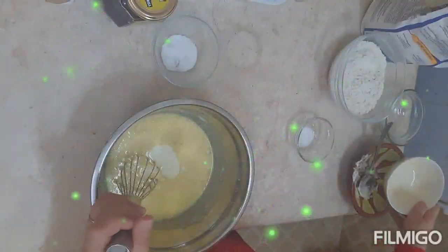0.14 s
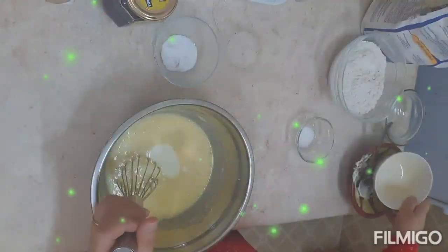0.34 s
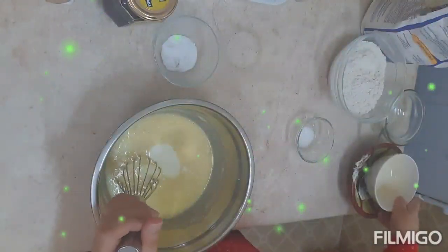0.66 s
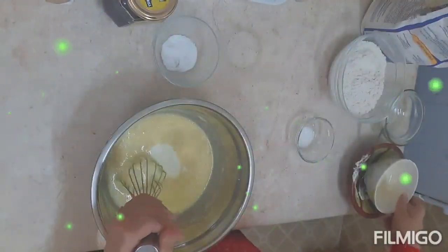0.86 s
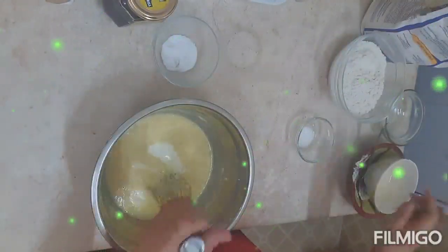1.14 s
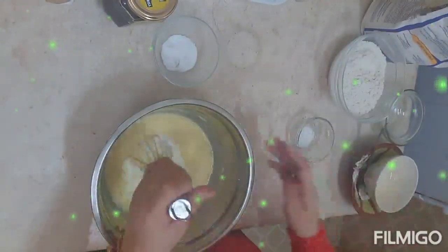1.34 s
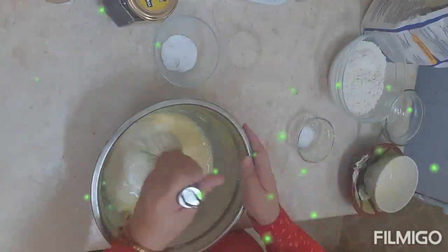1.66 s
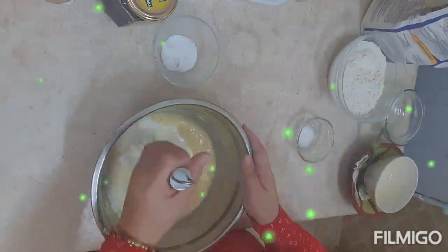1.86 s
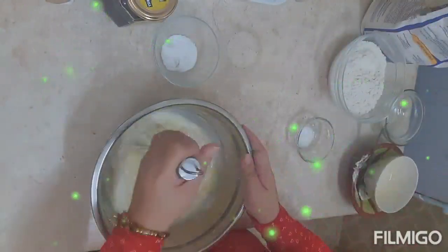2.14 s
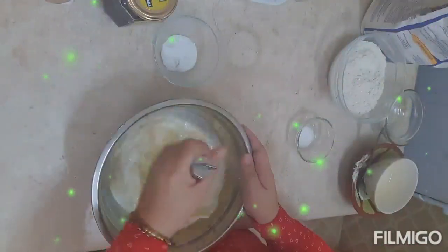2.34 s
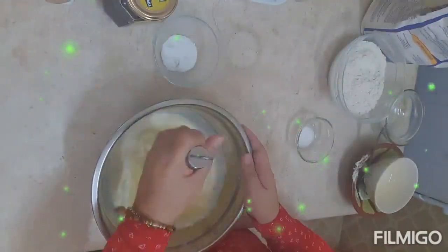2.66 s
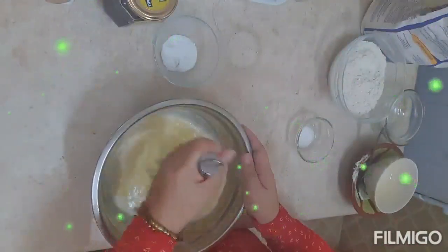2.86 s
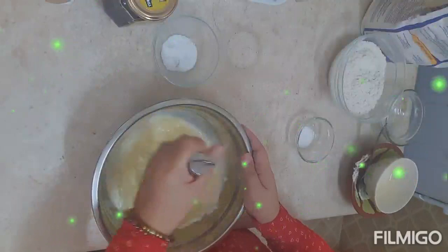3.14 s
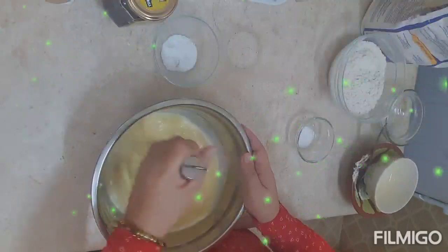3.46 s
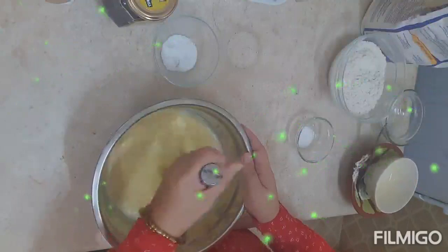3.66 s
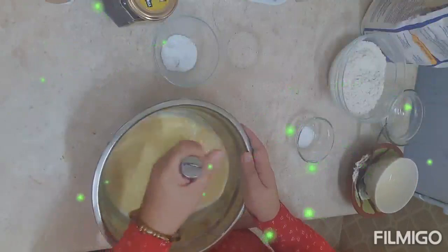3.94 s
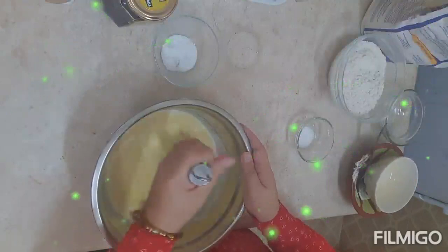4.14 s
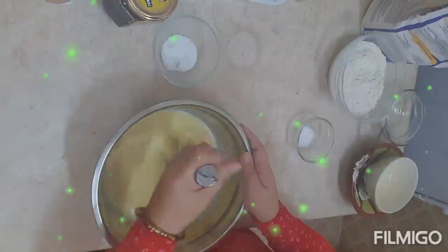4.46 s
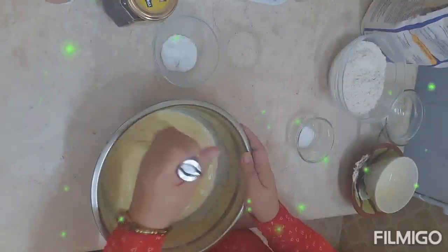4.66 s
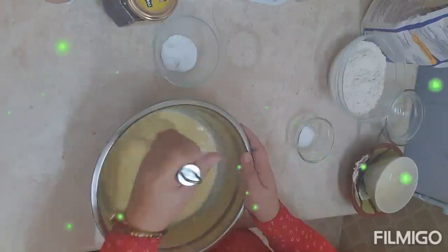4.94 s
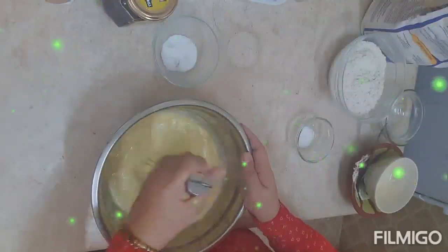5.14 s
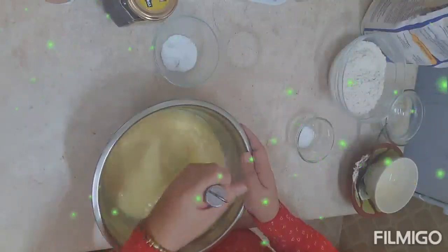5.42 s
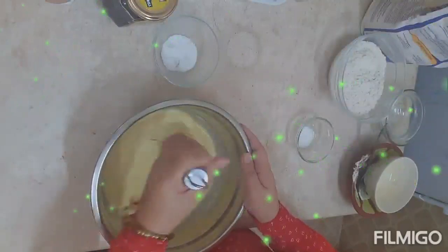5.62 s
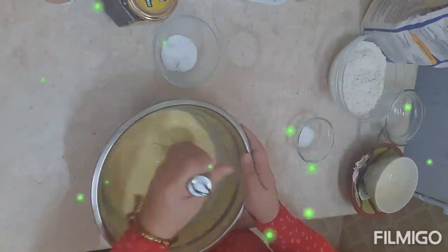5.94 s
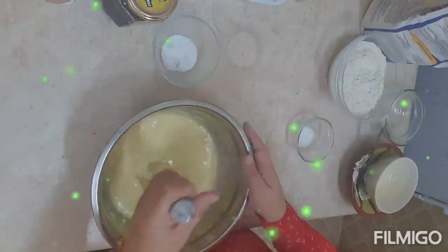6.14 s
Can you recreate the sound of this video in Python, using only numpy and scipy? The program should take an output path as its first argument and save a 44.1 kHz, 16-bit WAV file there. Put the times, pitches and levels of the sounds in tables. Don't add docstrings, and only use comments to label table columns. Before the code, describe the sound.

A refrigerator hums low and whines thinly in a hard-walled kitchen, heard by a small stereo pair just above the work. Whisk wires rustle barely audibly at 0.2-0.3 seconds. At 0.47 a china cup lands on dishes, foot then rim, a dry double clack with a short rattle. Light whisk touches tick the steel bowl at 0.9 and 1.3. Stirring starts with strong, bright clanks at 1.55, 1.68 and 1.95, the first with more low body. From 2 to 3.5 the wires mostly swish and hiss, with wet batter slaps, small pops and thin wire clicks. Knocks return at 3.55 and 3.85; after more swishing and slaps, they come steadily from 4.7, at 4.97, 5.25, 5.58, 5.91 and 6.23. Each cracks sharply, with a short damped metallic ring and room reverberation. Occasional dull counter thuds sit underneath.

```python
import sys
import numpy as np
from scipy import signal
from scipy.fft import rfft, irfft, next_fast_len
from scipy.io import wavfile
from scipy.ndimage import uniform_filter1d

SR = 44100
rng = np.random.default_rng(int(sys.argv[2]) if len(sys.argv) > 2 else 0)


def store_wav(level_fs):
    pcm = np.round(np.clip(np.atleast_2d(level_fs), -1, 1) * 32767)
    wavfile.write(sys.argv[1], SR, pcm.T.astype(np.int16))


def ratio_of_db(decibels):
    return 10 ** (np.asarray(decibels, float) / 20)


N = 277279

# (t/s, peak level/dB, low thud/dB, upper ring/dB, left minus right/dB)
KNOCKS = [(0.9248, -29, -15, -5.5, 1.5), (1.31, -32, -23.5, -12, 4.5), (1.3285, -37, -19, -15, -3),
          (1.548, -16.5, -6.5, -12, -1), (1.6803, -14, -19, -15, -0.5), (1.9456, -13, -15.5, -11, 2),
          (3.5488, -13.5, -19.5, -15, 1), (3.8539, -16, -18, -15.5, 1.5), (4.6836, -14.5, -21.5, -14.5, 0),
          (4.967, -14.5, -19.5, -12, 2.5), (5.253, -14, -17.5, -16.5, 1.5), (5.5797, -13, -19, -17, 3),
          (5.9126, -13.5, -22.5, -17.5, 0), (6.2306, -13.5, -22.5, -13.5, 0.5)]
# (f/Hz, width/Hz, level/dB)
WALL = [(784, 30, -1.5), (1049, 15.6, -2), (1240, 62, -1), (1941, 62, 6), (2530, 55, -4.5), (3330, 71, -2),
        (4074, 19, -0.5), (4210, 21, -5), (4520, 77, -7), (5374, 27, 0), (5600, 54, -13), (5980, 20, 7),
        (6870, 24, 0.5), (6590, 16, 8), (7105, 8.7, 10.5), (7530, 28, 2), (7800, 53, 4), (7430, 39, 2.5),
        (8110, 18, -12), (9180, 15, 0.5), (10500, 220, 18.5), (11300, 380, 24), (11740, 23, 7.5),
        (12800, 170, -20), (13300, 120, 4)]
GRIP_S = 1.45
SWELL_S = 0.012


def knocks():
    # (f/Hz, level/dB)
    crack_colour = [(180, -53), (300, -30), (1450, 5.5), (1900, -28), (2880, -3), (4100, 11), (7010, 5.5),
                    (8570, 7), (9320, -48), (12400, -39), (15200, -30), (16500, -52)]
    lead = 900
    out, rings, shocks = np.zeros((3, 2, N))
    thin_wires = signal.butter(4, [10500, 15500], "band", fs=SR, output="sos")
    for s, db, low_db, upper_db, pan_db in KNOCKS:
        top_db = -24 + 0.3 * upper_db
        force = np.pad(contact(0.011, decay_s=0.0077), ((0, 0), (lead, 4000)))
        skid = rng.standard_normal((2, lead)) * np.exp(np.linspace(-3.5, 0, lead))
        force[:, :lead] = ratio_of_db(-39) * skid
        sharp = np.pad(np.ones((2, 1)), ((0, 0), (lead + 40, force.shape[1] - lead - 41)))
        blow = .8 * sharp + .6 * force
        tilt = [(250, low_db - 14), (700, low_db + 5), (2500, low_db + 12.5), (3100, 0.0039), (5700, 0.0095),
                (6400, upper_db + 6.0), (8550, upper_db + 12.0), (8950, top_db + 14.0),
                (15000, top_db + 4.5), (16500, top_db)]
        crack = coloured(force, crack_colour)
        body = ratio_of_db(-10.5) * wall(blow) + ratio_of_db(-17.5) * belly(blow, lead)
        short = coloured(ratio_of_db(12.5) * crack + body, tilt)
        sizzle = signal.sosfilt(thin_wires, force)
        short = short / np.max(np.abs(short)) + ratio_of_db(top_db + 12.5) * sizzle / np.max(np.abs(sizzle))
        short[1] = np.roll(short[1], 1)
        start_s = s - .001 - lead / SR
        add(out, start_s, db + 5.5, pan_db, short)
        add(shocks, start_s, db, pan_db, coloured(coloured(sharp, crack_colour), tilt))
        rim_db, rim_ring = rim(held=s >= GRIP_S)
        add(rings, s, db + rim_db, pan_db, rim_ring)
    return out, rings, shocks


def wall(blow):
    total = 0
    for hz, width, db in WALL:
        level_db = db + 2.2 * rng.standard_normal((2, 1))
        sign = rng.choice([-1, 1], (2 if hz > 2200 else 1, 1))
        total = total + ratio_of_db(level_db) * sign * ring(blow, hz, min(1.02 / width, .022))
    return total


def belly(blow, lead):
    # (f/Hz, level/dB, time to fall 60 dB/s)
    belly_notes = [(3400, -7, 0.21), (3420, -4, 0.26), (3544, -3, 0.14), (4100, 5, 0.1), (4600, 0, 0.15),
                   (5240, -3.5, 0.12), (5500, -8, 0.088), (6050, 3, 0.11), (6465, 5, 0.09),
                   (7550, -1, 0.059)]
    total = sum(ratio_of_db(db + 0.96 * rng.standard_normal((2, 1))) * ring(blow, hz, t60)
                for hz, db, t60 in belly_notes)
    since_s = np.maximum(np.arange(blow.shape[1]) - lead, 0) / SR
    return total * (1 - np.exp(-since_s / SWELL_S))


def rim(held):
    # (f/Hz, level/dB, time to fall 60 dB/s)
    rim_notes = [(1760, -17, 0.48), (1890, -21.5, 0.81), (3462, -6, 0.84), (3400, -9, 0.7),
                 (3553, -10.5, 0.61), (3996, -5, 0.37), (4070, -2, 0.83), (4610, -5.5, 1),
                 (5140, -10, 0.96), (5500, -12, .6), (6050, -24, .6), (4400, -8, 0.87)]
    # (level/dB, share of ring time, upper notes/dB)
    rim_free = (-9.5, 0.823, -14.5)
    rim_held = (-22.5, 0.746, 0.43)
    rim_db, ring_share, upper_db = rim_held if held else rim_free
    span = round(.6 * SR)
    tap, total = np.pad(np.ones((1, 1)), ((0, 0), (0, span))), 0
    knots = np.arange(0, span, 900)
    for hz, db, t60 in rim_notes:
        waver_db = np.interp(np.arange(span + 1), 1.78 * knots, rng.standard_normal(len(knots)))
        level_db = db + upper_db * (hz > 3700) + 0.96 * rng.standard_normal((2, 1))
        level_db = level_db + (3.2 + 9 * (1 - ring_share)) * waver_db
        shifted_hz = hz + 25 * (1 - ring_share) * rng.standard_normal()
        total = total + ratio_of_db(level_db) * ring(tap, shifted_hz, t60 * ring_share)
    return rim_db, total * (1 - np.exp(-np.arange(span + 1) / SR / SWELL_S))


def knock_notes():
    # (t/s, f/Hz, level/dB)
    knock_leads = [
        (.9251, 4360, -42),
        (.9251, 7900, -42),
        (.9251, 6700, -52),
        (1.3095, 4400, -50),
        (1.3095, 7800, -47.5),
        (1.3289, 7760, -46),
                   (1.546, 1238, -34), (1.547, 4380, -21), (1.549, 5630, -35.5), (1.548, 6780, -30),
                  (1.548, 726, -41), (1.681, 4440, -29), (1.680, 5200, -28), (1.681, 6740, -29),
                  (1.680, 7752, -30), (1.680, 3480, -39), (1.946, 4380, -28), (1.945, 5270, -30),
                  (1.946, 6590, -29), (1.947, 7000, -25.5), (1.946, 7790, -26), (1.945, 4090, -36),
                  (3.5486, 3740, -32), (3.547, 4130, -30.5), (3.549, 5500, -30), (3.549, 6100, -38),
                  (3.548, 7250, -41), (3.5475, 8400, -31.5), (3.854, 3553, -33), (3.854, 4020, -30.5),
                  (3.855, 5580, -32.5), (3.854, 5930, -32), (3.854, 6520, -34), (3.853, 7400, -37),
                  (4.684, 3520, -30), (4.683, 3980, -40), (4.684, 5310, -30.5), (4.686, 6130, -29.5),
                  (4.684, 6770, -31), (4.684, 8430, -28), (4.967, 4050, -29), (4.966, 4650, -30),
                  (4.967, 6130, -30), (4.966, 6880, -27), (4.967, 8600, -39), (5.253, 3563, -32),
                  (5.253, 4026, -26.5), (5.253, 4690, -29), (5.252, 6050, -29.5), (5.253, 1890, -32.5),
                  (5.58, 4010, -26), (5.5785, 4730, -25.5), (5.5796, 6030, -30), (5.5794, 6465, -32),
                  (5.5791, 1920, -37.5), (5.912, 4010, -28), (5.913, 4370, -41), (5.913, 6060, -29),
                  (5.912, 7460, -32), (5.913, 1914, -39), (6.228, 4360, -42), (6.2318, 5240, -38),
                  (6.23, 7170, -31), (6.2304, 7700, -42), (6.2304, 1890, -43), (5.253, 8260, -30)]
    return leading_notes(knock_leads, 7.5, t60=0.038)


def loops():
    # (f/Hz, level/dB, time to fall 60 dB/s)
    loop_notes = [(3490, 4, 0.75), (3900, -16, 0.45), (4660, -1.5, 0.86), (4600, -4, 0.95),
                  (5150, -2, 0.65), (5400, -3, 0.47), (5660, -11, .6), (6200, -5, .5), (6460, -8, 0.4),
                  (7360, -13, .6), (7750, -10, 0.51), (8500, -14, 0.67)]
    out, t = np.zeros((2, N)), np.arange(round(.45 * SR)) / SR
    hz, level_db, t60 = np.transpose(loop_notes)[:, :, None]
    knots = np.linspace(0, .45, num=12)
    for s, db in [row[:2] for row in KNOCKS if row[0] > GRIP_S]:
        chance = rng.standard_normal((len(loop_notes), len(knots)))
        waver = np.array([np.interp(t, knots, row) for row in chance])
        gain = ratio_of_db(level_db + 4.0 * waver - 60 * t / t60) * (1 - np.exp(-t / SWELL_S))
        sides = np.sin(2 * np.pi * (hz * t + rng.random((2, len(loop_notes), 1))) + waver)
        add(out, s, db - 22, 1.0, np.sum(gain * sides, axis=1))
    return out


def drag():
    # (t/s, level/dB)
    effort = [(1.2, -60), (1.4, -59), (1.9, -56), (2.3, -54), (2.5, -51), (2.65, -56), (2.95, -50.5),
              (3.12, -57), (3.35, -52.5), (3.7, -62), (4.03, -53), (4.22, -62), (4.46, -45.5), (4.6, -57),
              (4.8, -56), (5.15, -54.5), (5.6, -57.5), (6.29, -53.5)]
    # (f/Hz, level/dB)
    swish_colour = [(350, -56), (600, -26), (657, -3), (980, -14), (1740, -3), (1930, -2.5), (3470, -5),
                    (5790, 1.5), (7680, -1), (9000, -10.5), (11700, -12), (19800, -120)]
    # (f/Hz, level/dB)
    hiss_colour = [(5000, -34), (8500, -25), (9330, -25.0), (10600, -1.5), (12000, 2.0), (13500, -3.0),
                   (15500, 0.5), (15900, -56)]
    t = np.arange(N) / SR
    effort_db = np.interp(t, *np.transpose(effort))
    stirring = np.clip((t - 1.2) / 0.28, 0, 1)
    stroke_db = 2.6 * drift(9)
    scrape = ratio_of_db(-24) * after_knocks(rise_s=0.013, fall_s=0.072)
    swish = (ratio_of_db(effort_db + stroke_db) + scrape) * patchy(wide_noise(swish_colour, grain=1.8))
    fine = ratio_of_db(-60 + 0.93 * (effort_db + 54.5) + stroke_db + 1.2 * drift(30))
    fine_scrape = ratio_of_db(-48) * after_knocks(rise_s=0.035, fall_s=0.06)
    hiss = (fine + fine_scrape) * wide_noise(hiss_colour, grain=0.38)
    return stirring * (swish + hiss + batter(effort_db - 9.5)) + flecks(effort_db)


def patchy(x):
    edges, total = np.geomspace(400, 17000, num=12), 0
    for band in zip(edges, edges[1:]):
        part = signal.sosfilt(signal.butter(2, band, "band", fs=SR, output="sos"), x)
        total = total + ratio_of_db(1.4 * drift(18.0)) * part
    return rms_one(total)


def flecks(swish_db):
    # (t/s, level/dB, length/s)
    rustles = [
        (0.162, -60, 0.036),
        (0.21, -67, 0.017),
        (.325, -65, 0.033),
    ]
    t, grazes_per_s = np.arange(N) / SR, 260
    pitches = [hz for hz, width, db in WALL if 4000 < hz < 8500][::2] + [5180, 7310, 5900]
    born = (rng.random(N) < grazes_per_s / SR) * ratio_of_db(1.8 * np.minimum(rng.exponential(1, N), 3))
    dealt = rng.integers(0, len(pitches), N)
    rub = rng.standard_normal((2, SR // 2))
    graze = sum(ring(born * (dealt == k), hz, 0.035) * rng.uniform(-1.3, 1, (2, 1))
                for k, hz in enumerate(pitches))
    out = ratio_of_db(swish_db - 9) * rms_one(graze) * (t > 1.3)
    rustle = rms_one(sum(ring(rub, hz, 0.2) for hz in pitches))
    swell = sum(ratio_of_db(db) * np.exp(-((t[:SR // 2] - s) / length_s) ** 2) for s, db, length_s in rustles)
    out[:, :SR // 2] += rustle * swell
    return out


def batter(swish_db):
    sizes = ratio_of_db(0.87 * np.minimum(rng.exponential(1, N), 4)) * rng.choice([-1, 1], N)
    born = rng.random(N) < 60 * ratio_of_db(6 * drift(7)) / SR
    pitches, dealt = np.geomspace(600, 2600, num=9), rng.integers(0, 9, N)
    bubbles = sum(ring(sizes * born * (dealt == k), hz, 38.0 / hz) * ratio_of_db(3.5 * rng.standard_normal((2, 1)))
                  for k, hz in enumerate(pitches))
    return ratio_of_db(.5 * (swish_db + 38.0) - 62) * rms_one(bubbles)


def ticks():
    # (t/s, peak level/dB, f/Hz, brightness/dB)
    slaps = [(1.435, -31, 2130, -15), (1.436, -39, 1410, -22), (1.836, -41.5, 1240, -14),
             (2.174, -38, 1430, 2), (2.366, -38, 2020, -27), (2.408, -32.5, 1450, -21),
             (2.419, -41, 860, -18), (2.719, -31, 2070, -11), (2.726, -35, 717, -6), (2.74, -34, 720, 23),
             (2.885, -35.5, 2500, -1.5), (2.895, -37, 2560, -8), (3.162, -44, 1900, -19),
             (3.234, -41, 1610, -2), (4.051, -41.5, 1590, -19), (4.065, -41.5, 1730, -26),
             (4.089, -44, 1630, -17), (4.15, -39, 1440, -2), (4.344, -42, 2060, -65),
             (4.358, -45, 1360, -29), (4.39, -47.5, 670, -4), (4.434, -43, 1330, -17),
             (4.457, -32, 1480, 11), (4.506, -44, 2520, -3), (4.538, -44.5, 1360, -18),
             (4.59, -48.5, 662, -24), (4.632, -48, 1600, -22), (4.666, -34.5, 1220, -5),
             (4.747, -60, 1970, -23), (4.896, -42, 1740, -15), (4.939, -33.5, 1880, -4),
             (5.022, -39, 582, -15), (5.03, -58, 1210, -20), (5.209, -36, 1690, -11)]
    wire_snaps = [(2.408, -25, 3600, -31), (2.929, -30, 2620, -8), (3.434, -36, 4400, -3),
                  (2.679, -44, 6680, -3), (2.737, -35, 7430, -17), (2.884, -49, 7400, -5),
                  (2.894, -42, 7350, -10), (3.064, -45, 8000, -8), (3.358, -42, 7890, -10),
                  (3.434, -39, 7250, -6), (4.392, -28, 5400, 2), (4.460, -38, 6480, 5),
                  (4.508, -39, 6110, 6)]
    out = np.zeros((2, N))
    smeared = [(*row, 0.0084) for row in slaps] + [(*row, 0.001) for row in wire_snaps]
    for s, db, hz, bright_db, smear_s in smeared:
        force = np.pad(contact(0.086, decay_s=smear_s), ((0, 0), (0, 2500)))
        slap = ring(force, hz, 30.0 / hz) + 2.55 * ring(force, 1.46 * hz, 2.5 / hz)
        slap = slap + .5 * ring(force, 720, 0.025)
        click = sum(ring(force, wall_hz, min(0.25 / width, .008)) * ratio_of_db(wall_db)
                    for wall_hz, width, wall_db in WALL if 3000 < wall_hz < 9000)
        add(out, s - .001, db, 0, rms_one(slap) + ratio_of_db(bright_db + 0.5) * rms_one(click))
    return signal.sosfilt(signal.butter(3, 470, "high", fs=SR, output="sos"), out)


def pops():
    # (t/s, f/Hz, level/dB)
    blobs = [(2.408, 1165, -46), (2.725, 1170, -44.5), (2.728, 1700, -49), (2.93, 1370, -52),
             (3.552, 1040, -37), (3.56, 716, -44.5), (4.342, 2040, -45), (4.358, 1300, -53),
             (4.395, 646, -46.5), (4.435, 1330, -43), (4.454, 1440, -40), (4.454, 734, -56),
             (4.538, 1330, -53), (4.63, 1610, -49), (4.705, 754, -49), (4.70, 1950, -47), (4.94, 2020, -41),
             (4.94, 710, -53), (5.025, 538, -48), (5.022, 1260, -46)]
    return leading_notes(blobs, 0.5, t60=0.031)


def cup():
    # (t/s, peak level/dB, brightness/dB)
    cup_hits = [
        (0.47, -23.5, -5),
        (0.494, -23.5, -2.5),
    ]
    # (f/Hz, level/dB, time to fall 60 dB/s)
    china_notes = [(1070, -28, 0.045), (1360, -0.5, 0.036), (1330, -23, 0.069), (1570, -0.5, 0.022),
                   (1895, 1.5, 0.026), (2134, -3.5, 0.033), (2560, 4.5, 0.0094), (3060, -7, 0.016),
                   (3740, 10, 0.0033), (3685, -7.5, 0.21), (4600, -3, 0.013), (5240, 6, 0.0073),
                   (5530, -7, 0.022), (5730, -15, 0.18), (7000, -1, 0.013), (7480, 3, 0.0092),
                   (10790, 2, 0.0072), (11500, -12, 0.006)]
    out = np.zeros((2, N))
    rattle_band = signal.butter(4, [800, 7800], "band", fs=SR, output="sos")
    for s, db, bright_db in cup_hits:
        force = np.pad(contact(0.055, decay_s=0.0089), ((0, 0), (0, SR // 3)))
        body = 0
        for hz, note_db, t60 in china_notes:
            level_db = note_db + 2.0 * rng.standard_normal((2, 1)) + bright_db * (hz > 3000)
            body = body + ratio_of_db(level_db) * ring(force, hz, t60)
        rattle = signal.sosfilt(rattle_band, force)
        add(out, s - .001, db + 0.5, 1.5, body + ratio_of_db(21.5) * rattle)
    return signal.sosfilt(signal.butter(2, 12000, fs=SR, output="sos"), out)


def cup_notes():
    # (t/s, f/Hz, level/dB)
    cup_leads = [
        (.47, 1277, -36.5),
        (.47, 1377, -37),
        (.474, 4940, -37),
        (.47, 5750, -36.5),
        (.494, 1855, -44),
        (.494, 2530, -38),
        (.494, 5100, -35),
        (.494, 6920, -37),
        (.494, 1435, -43),
    ]
    return leading_notes(cup_leads, 7, t60=0.046)


def thuds():
    # (t/s, peak level/dB)
    foot_thuds = [
        (1.682, -40),
        (3.547, -32),
        (4.686, -30.5),
        (4.969, -38),
    ]
    hz, t60 = 298, 0.0073
    out = np.zeros((2, N))
    push = np.pad(np.hanning(40)[None].repeat(2, axis=0), ((0, 0), (0, 3000)))
    body = ring(push, hz, t60) + 1.6 * ring(push, 1.86 * hz, t60)
    for s, db in foot_thuds:
        add(out, s, db, 0, body)
    return out


def refrigerator():
    # (f/Hz, level/dB)
    hum_tones = [(48.5, -89), (98.3, -70.5), (147.5, -61), (395, -71.5), (445, -71.5)]
    # (f/Hz, level/dB)
    whine_tones = [(2536, -84), (3042, -75), (3456, -86), (3731, -86), (4310, -84), (4662, -78),
                   (4893, -69), (5206, -68), (5588, -72), (6239, -75)]
    # (t/s, level/dB, length/s)
    bumps = [(0.274, -53, 0.069), (1.094, -55, 0.052), (1.49, -53, 0.036), (1.603, -43, 0.1),
             (2.406, -46.5, 0.043), (2.975, -60, 0.18), (3.55, -53, 0.033), (3.757, -59, .04),
             (4.002, -43.5, 0.037), (4.082, -45, 0.04), (4.7, -54, 0.034), (4.86, -52, 0.036),
             (5.297, -68, 0.025)]
    # (f/Hz, level/dB)
    air_colour = [(76, -16.5), (130, -11.5), (157, -13.5), (178, -16.5), (578, -16), (1040, -27),
                  (1850, -19.5), (2900, -36), (3110, -35), (4100, -37), (5050, -22.5), (7020, -25.5),
                  (8200, -50), (10700, -91), (18000, -120)]
    t = np.arange(N) / SR
    duck = ratio_of_db(-2.5 * after_knocks(.01, fall_s=0.84) / ratio_of_db(-14.0))
    beat = 1 - 0.25 * np.cos(2 * np.pi * (t - 0.98) / 1)
    hum = sum(ratio_of_db(db + 1.0 + 4.0 * drift(9.0)) * np.sin(2 * np.pi * hz * t + 1.52 * drift(2.54))
              for hz, db in hum_tones)
    whine = sum(ratio_of_db(db + 4.5 + 2.0 * drift(2.9)) * np.sin(2 * np.pi * hz * t + 0.76 * drift(4.8))
                for hz, db in whine_tones)
    load_db = 18 * (np.cos(2 * np.pi * (t - .1) / 2.13) - 1)
    whine = ratio_of_db(load_db + np.array([[1.5], [-1.5]])) * whine
    boom = ratio_of_db(-55 + 2.0 * drift(6.3)) * duck
    boom = boom + sum(ratio_of_db(db) * np.exp(-((t - s) / length_s) ** 2) for s, db, length_s in bumps)
    low_noise = wide_noise([(30, -32), (45, 4.5), (62, 3.5), (80, -10.5), (100, 3.0), (130, -11.5)])
    rumble = ratio_of_db(-6.5) * boom * low_noise
    air = ratio_of_db(-59.5 + 1.0 * drift(23)) * wide_noise(air_colour)
    air = air + ratio_of_db(-80.5) * wide_noise([(9800, -23), (10400, 0), (14500, -1.0), (15500, -35)])
    return duck * (beat * hum + whine) + rumble + air


def kitchen(x):
    # (f/Hz, time to fall 60 dB/s)
    room_t60 = [(300, 0.52), (900, 0.86), (2500, 1), (5500, 0.9), (8300, 0.39), (9500, 0.4), (15000, 0.54)]
    t, edges = np.arange(round(.8 * SR)) / SR, 200 * 2 ** np.arange(0, 6.6, .5)
    white, tail = rng.standard_normal((2, 2, len(t))), 0
    for k, (low, high) in enumerate(zip(edges, edges[1:])):
        band = signal.sosfilt(signal.butter(2, [low, high], "band", fs=SR, output="sos"), white[k % 2])
        tail = tail + band * ratio_of_db(-60 * t / at_hz(room_t60, np.sqrt(low * high)))
    early = 1 + 1.5 * np.exp(-t / .03)
    tail = tail * early * np.clip((t - .002) / .018, 0, 1)
    return signal.fftconvolve(x, tail / np.sqrt(np.sum(tail ** 2) / 2), axes=1)[:, :N]


def leading_notes(table, level_db, t60):
    out, t = np.zeros((2, N)), np.arange(round(.2 * SR)) / SR
    for (s, hz, db), (phase, apart) in zip(table, rng.uniform(-1.064, 1, (len(table), 2))):
        spread = 1.27 * min(1, hz / 3500) * apart * np.array([[1], [-1]])
        sides = np.sin(2 * np.pi * hz * t + np.pi * phase + spread)
        fade = ratio_of_db(-60 * t / (t60 * max(1, 2400 / hz)))
        add(out, s, db + level_db, 1.5, sides * np.minimum(t / 0.0011, 1) * fade)
    return out


def after_knocks(rise_s, fall_s):
    s, db = np.transpose(KNOCKS)[:2, :, None]
    coarse = np.arange(0, N, 20)
    since = coarse / SR - s
    strength = ratio_of_db(db) * np.exp(np.minimum(since / rise_s, -since / fall_s))
    return np.interp(np.arange(N), coarse, np.sum(strength, axis=0))


def contact(length_s, decay_s):
    t = np.arange(round(length_s * SR)) / SR
    shared, own = rng.standard_normal(len(t)), rng.standard_normal((2, len(t)))
    burst = (shared + 0.89 * own) * np.minimum(t / 0.00036, 1) * np.exp(-t / decay_s)
    return rms_one(burst) / np.sqrt(len(t))


def ring(clicks, hz, t60):
    r, w = ratio_of_db(-60 / (t60 * SR)), 2 * np.pi * hz / SR
    return signal.lfilter([0, np.sin(w)], [1, -2 * r * np.cos(w), r * r], clicks + 1e-18)


def add(out, s, db, pan_db, body):
    at = round(s * SR)
    body = body[:, :N - at] / np.max(np.abs(body.mean(axis=0)))
    out[:, at:at + body.shape[1]] += body * ratio_of_db(db + pan_db * np.array([[.5], [-.5]]))


def wide_noise(spectrum, grain=0.0):
    # (f/Hz, likeness from 0 to 1)
    likeness = [(60, 0.91), (240, 0.52), (950, 0.21), (3770, -0.1), (15000, -0.04)]
    mid, side = rng.standard_normal((2, N)) * ratio_of_db(grain * drift(62))
    alike = [(hz, np.clip(c, 0, .99)) for hz, c in likeness]
    alike = [(10, alike[0][1])] + alike + [(22000, alike[-1][1])]
    mid = coloured(mid, [(hz, 10 * np.log10(1 + c)) for hz, c in alike])
    side = coloured(side, [(hz, 10 * np.log10(1 - c)) for hz, c in alike])
    return rms_one(coloured(np.array([mid + side, mid - side]), spectrum))


def coloured(x, spectrum):
    size = next_fast_len(x.shape[-1])
    hz = np.maximum(np.arange(size // 2 + 1) * SR / size, 1)
    below = np.maximum(np.log2(spectrum[0][0] / hz), 0)
    above = np.maximum(np.log2(hz / spectrum[-1][0]), 0)
    gain = ratio_of_db(at_hz(spectrum, hz) - 9.4 * (below + above))
    return irfft(rfft(x, size) * gain, size)[..., :x.shape[-1]]


def at_hz(points, hz):
    points_hz, values = np.transpose(points)
    return np.interp(np.log(hz), np.log(points_hz), values)


def drift(rate):
    r = np.exp(-80 * np.pi * rate / SR)
    slow = signal.lfilter([1], [1, -2 * r, r * r], rng.standard_normal(N // 40 + 2002))[2000:]
    return np.interp(np.arange(N) / 40, np.arange(len(slow)), rms_one(slow))


def rms_one(x):
    return x / np.sqrt(np.mean(x ** 2) + 1e-20)


def scene():
    hits, rings, shocks = knocks()
    small, china = ticks(), cup()
    leads, china_leads = knock_notes(), cup_notes()
    to_room = ratio_of_db(-14.0) * (leads + china_leads) + ratio_of_db(-8.0) * (hits + small)
    to_room = to_room + ratio_of_db(-3.5) * rings + ratio_of_db(5.0) * shocks + ratio_of_db(1.5) * china
    struck = hits + leads + china_leads + rings + small + china + thuds()
    return struck + kitchen(to_room) + drag() + refrigerator() + loops() + pops()


def thin_treble(x):
    hz, t, z = signal.stft(x, SR, nperseg=1024)
    middle = (hz > 3000) & (hz < 8000)
    power = uniform_filter1d(np.abs(z) ** 2, size=3, axis=2, origin=1)
    mask = power[:, middle].mean(axis=1, keepdims=True)
    margin_db = np.interp(hz, [8800, 8900, 10200, 12300, 13950, 16200],
                          [-40, -21.5, -18.0, -21.0, -14.5, -7])[:, None]
    strips_db = 15 * uniform_filter1d(rng.standard_normal(z.shape[1:]), size=6, axis=1)
    limit = mask * (mask / np.median(mask)) ** .3 * ratio_of_db(margin_db) ** 2 + ratio_of_db(-104) ** 2
    keep = power > limit * ratio_of_db(strips_db) ** 2
    sudden = np.mean(np.abs(z[:, middle]) ** 2, axis=1, keepdims=True) > 1.7 * mask
    keep = (keep | sudden | (hz < 8300)[:, None]) & (hz < 16600)[:, None]
    hush = 1 - np.exp(-((np.arange(N) / SR - .46) / .003) ** 4)
    return signal.istft(z * keep, SR, nperseg=1024)[1][:, :N] * hush


def band_limit(x):
    return signal.sosfilt(signal.butter(12, 16630, fs=SR, output="sos"), x)


def record(dry):
    rounded = np.tanh(dry / .85) * 0.89
    mix = thin_treble(rounded)
    return band_limit(mix)


dry = scene()
out = record(dry)
store_wav(out)
```